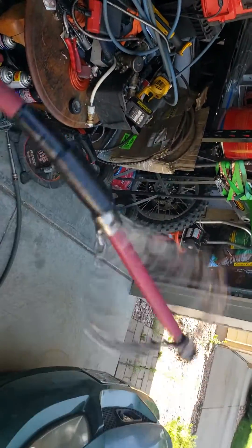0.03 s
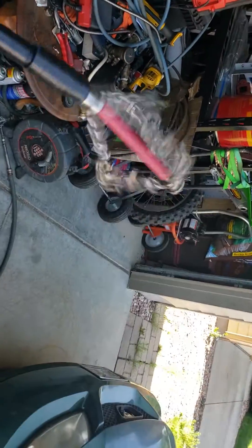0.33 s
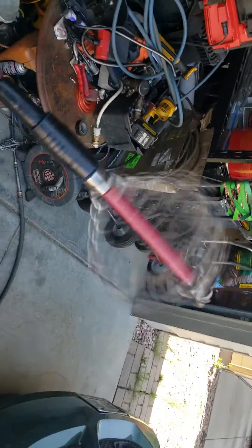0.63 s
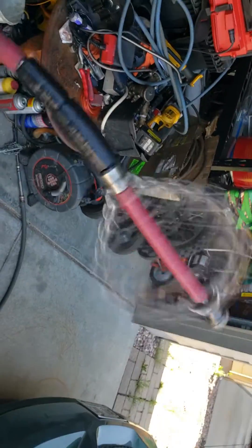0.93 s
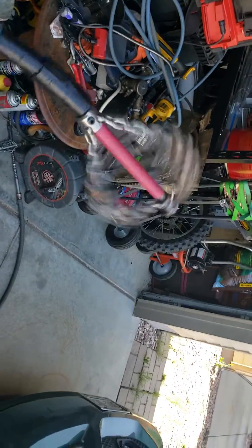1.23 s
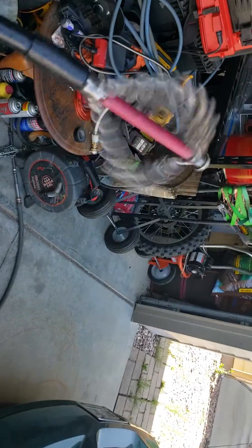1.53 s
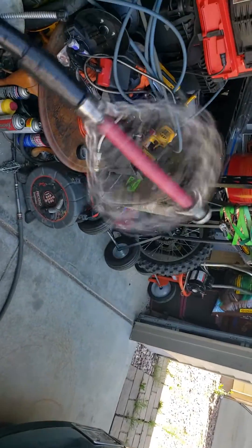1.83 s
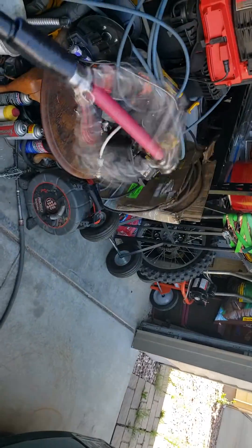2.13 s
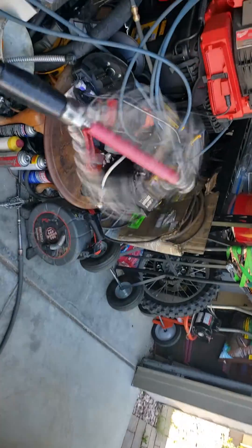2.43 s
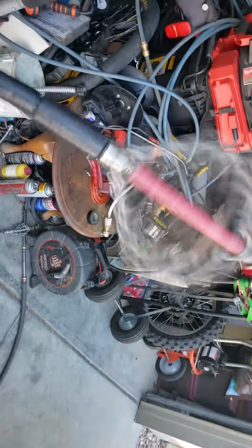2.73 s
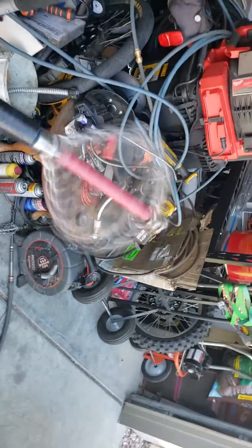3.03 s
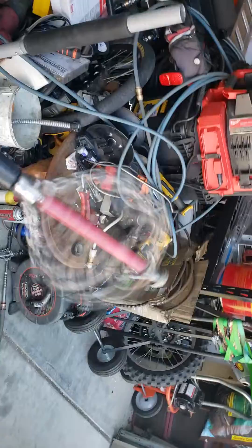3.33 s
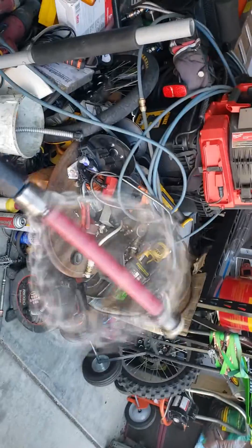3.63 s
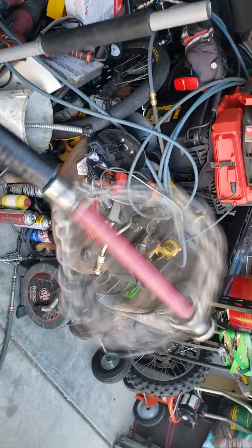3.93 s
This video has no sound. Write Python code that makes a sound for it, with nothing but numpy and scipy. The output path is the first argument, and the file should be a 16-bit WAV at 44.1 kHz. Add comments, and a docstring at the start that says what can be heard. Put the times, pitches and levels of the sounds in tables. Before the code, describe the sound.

Whirling chains rattle brightly over the continuous gear whine of a motor-driven shaft.

```python
"""A bright spray of rattling chain over a gear whine, close to a stereo microphone in a garage.
A motor drives a flexible shaft with chains whirling on its end. The whine sags in pitch under load
and flutters with each turn of the chains. The rattle surges when the links bunch up; now and then
they clack on the shaft, which drums in its sleeve underneath it all."""
import sys
import numpy as np
from scipy import signal
from scipy.fft import rfft, irfft, next_fast_len
from scipy.io import wavfile
from scipy.ndimage import map_coordinates

SR = 44100
rng = np.random.default_rng(int(sys.argv[2]) if len(sys.argv) > 2 else 0)


def unload_audio(sound):
    """Save the sound as a 16-bit wav file, at the path given as the first command line argument."""
    columns = np.transpose(np.atleast_2d(sound))
    # keep every value between -1 and 1, then stretch to whole-number steps
    steps = np.round(np.clip(columns, -1, 1) * 32767)
    wavfile.write(sys.argv[1], SR, steps.astype(np.int16))


N = 176400


def amp(db):
    """Decibels to gain."""
    return 10 ** (np.asarray(db) / 20)


def unit(x):
    """Scale to rms 1."""
    return x / np.sqrt(np.mean(x ** 2) + 1e-20)


def along(points, hz, column=1):
    """One column of a table read on a log frequency axis."""
    cols = np.transpose(points)
    return np.interp(np.log(hz + 1), np.log(cols[0] + 1), cols[column])


def curves(rows):
    """One value per sample for each column after the time."""
    times, *cols = np.transpose(rows)
    return [np.interp(np.arange(N) / SR, times, col) for col in cols]


def wobble(rate):
    """A smooth random curve, rate knots a second."""
    return map_coordinates(rng.standard_normal(int(N * rate / SR) + 4), [np.arange(N) * rate / SR])


def swell(at_s, length_s):
    """A bell of height 1, length_s wide at half height."""
    return .5 ** ((2 * (np.arange(N) / SR - at_s) / length_s) ** 2)


def filtered(x, response):
    """Filter x by a complex response of frequency."""
    size = next_fast_len(N + SR // 2)
    return irfft(rfft(x, size) * response(np.fft.rfftfreq(size, 1 / SR)), size)[..., :N]


def panned(db):
    """Left and right gains for a level difference."""
    return amp(np.array([[.5], [-.5]]) * db)


def at_microphone(pair, spectrum):
    """Two unrelated excitations, coloured and heard at the microphone's two ports, rms 1."""
    # between the ports (frequency [Hz], coherence [0-1], left minus right [dB], left lead [ms])
    ports = [(60, 0.92, 1, 0), (180, 0.97, 2, 0.024), (400, 0.85, 3, 0.019), (810, 0.62, 1, 0),
             (1160, 0.4, -2.3, 0.17), (1550, 0.85, -1, 0.29), (3650, 0.07, -0.5, 0.29),
             (5200, 0.97, -7, 0.29), (7400, 0, 1, 0.252), (11300, 0.47, 2.4, 0.256),
             (15000, 0.54, -3.5, 0.26)]
    blend = lambda hz: np.arccos(np.clip(along(ports, hz), 0, 1)) / 2
    mid, side = filtered(pair, lambda hz: amp(along(spectrum, hz)) * [np.cos(blend(hz)), np.sin(blend(hz))])
    lead = lambda hz: np.exp(np.array([[1j], [-1j]]) * np.pi * hz * along(ports, hz, column=3) / 1000)
    left_right = np.array([mid + side, mid - side])
    return unit(filtered(left_right, lambda hz: lead(hz) * panned(along(ports, hz, column=2))))


def contacts(per_s, spread_db, ring_s, hiss):
    """Random link contacts, each a brief burst of noise, over a steady rub."""
    hits = (rng.random((2, N)) < per_s / SR) * amp(spread_db * np.clip(rng.standard_normal((2, N)), -3, 3))
    power = signal.lfilter([1], [1, -np.exp(-1 / (ring_s * SR))], hits ** 2)
    return unit(np.sqrt(power / power.mean() + hiss) * rng.standard_normal((2, N)))


def struck(blows, modes, rise_s, crack_gain=0, crack_t60_s=.007):
    """Each blow rings the modes a little differently; crack_gain adds an opening snap of noise."""
    out, t = np.zeros((2, N + SR)), np.arange(SR // 6) / SR
    for at_s, peak_db in blows:
        ring = sum(amp(db + rng.normal(0, 1.5, (2, 1)) - 60 * t / t60)
                   * np.sin(2 * np.pi * hz * rng.normal(1, .02) * t) for hz, db, t60 in modes)
        crack = crack_gain * amp(-60 * t / crack_t60_s) * rng.standard_normal((2, len(t)))
        blow = ring * (1 - np.exp(-t / rise_s)) + crack
        out[:, round(at_s * SR):][:, :len(t)] += amp(peak_db) * blow / abs(blow).max()
    return out[:, :N]


def garage(x):
    """The cluttered walls send a short tail back to the microphone."""
    # room decay (frequency [Hz], t60 [s])
    decay = [(200, 0.16), (2000, 0.28), (14000, 0.23)]
    hz, t, noise = signal.stft(rng.standard_normal((2, SR // 2)), SR, nperseg=256)
    tail = signal.istft(noise * amp(-60 * t / along(decay, hz)[:, None]), SR, nperseg=256)[1]
    return signal.fftconvolve(x, tail / np.linalg.norm(tail[0]), axes=1)[:, :N]


def shaft(speed):
    """The whipping shaft drums and rubs in its hollow sleeve, and howls as it speeds up."""
    # course of the drumming (time [s], level [dB])
    drum_levels = [(0.0, -29.5), (0.1, -33), (0.24, -29.5), (0.29, -32), (0.68, -34), (1.37, -29),
                   (1.46, -36), (1.89, -33.5), (2.05, -35), (2.1, -31.5), (2.49, -34), (2.65, -31),
                   (2.68, -39), (2.74, -32), (3.38, -34), (3.51, -38), (3.98, -31), (4.0, -31)]
    # colours of the drumming, the rub and the howl (frequency [Hz], relative level [dB])
    drum_spectrum = [(20, -39), (35, -36), (52, -17.5), (75, -15), (102, -10.5), (128, -16.5), (148, -9),
                     (165, 0), (190, -3), (215, -9), (245, -8.5), (275, -19), (318, -6.5), (355, -11),
                     (420, -20), (600, -21.5), (1200, -41)]
    rub_spectrum = [(300, -45), (480, -8.5), (600, -9), (650, 4), (700, -2.5), (740, 6.5), (785, 0),
                    (850, 4), (908, 8), (970, 1.5), (1250, -5), (1700, -3), (3000, -36)]
    howl_spectrum = [(200, -45), (275, -8), (316, 10), (350, 1.5), (400, -22), (600, -63)]
    idle_speed = 87.1  # turns per second
    rush = lambda spectrum: at_microphone(rng.standard_normal((2, N)), spectrum)
    drum = amp(curves(drum_levels)[0] - .5 + wobble(24.76)) * rush(drum_spectrum)
    rub = amp(-37.5 + 1.5 * wobble(30.37)) * rush(rub_spectrum)
    howl = amp(-44.5 + 1.28 * (speed - idle_speed)) * rush(howl_spectrum)
    return drum + rub + howl


def thumps():
    """The shaft knocks dully against its sleeve."""
    # knocks (time [s], peak [dB])
    blows = [(1.322, -19), (3.024, -20)]
    # sleeve resonances (frequency [Hz], relative level [dB], t60 [s])
    modes = [(172, 0, .12), (322, -3, .12)]
    return struck(blows, modes, rise_s=.005)


def whine(speed, chain_angle):
    """Meshing gears sing over a faint motor hum, fluttering with each turn of the chains."""
    # gear tones (time [s], mesh [dB], left minus right [dB], 2nd harmonic [dB], 3rd harmonic [dB])
    gear_levels = [(0, -33, 0, -39.5, -47), (.1, -40, 2, -39, -54), (.15, -38, 2, -45, -56),
                   (.2, -29.5, 2, -38, -60), (.3, -30.5, -1, -46, -52), (.41, -30.5, -3, -50, -46),
                   (.6, -43, 2, -56, -50), (.71, -32, -1, -42.5, -37), (.82, -42, -3, -50, -50),
                   (.9, -42, -3, -52, -52), (.96, -29.5, -4, -45, -51), (1.11, -37, 1, -52, -53),
                   (1.22, -31, -4, -41.5, -53), (1.35, -28.5, -5, -42, -47), (1.65, -35, -14, -47.5, -43),
                   (2.08, -30.5, -7.5, -44.5, -45), (2.5, -33.5, -13, -47, -46),
                   (2.62, -35.5, -9, -49, -52), (2.78, -28, -4, -44, -47), (3.01, -34, -4, -44, -50),
                   (3.08, -30.5, -4, -37, -48), (3.22, -32, -5, -44, -48), (3.47, -30.5, -6, -56, -49),
                   (3.57, -38, -3, -52, -39.5), (3.72, -32, -4, -53, -44), (4, -31, -1, -52, -48)]
    # gear sidebands (multiple of the drive speed [-], level [dB])
    sidebands = [(67, -51.5), (76, -49.5)]
    # the gear housing muffles the top (frequency [Hz], gain [dB])
    housing = [(7750, 0), (7950, -3), (8200, -20)]
    teeth, hum_order = 30, 10 / 3  # cycles per turn of the drive
    mesh_db, pan_db, second_db, third_db = curves(gear_levels)
    flutter = 1 + .0048 * np.sin(chain_angle) + .002 * wobble(25) + .0035 * wobble(300)
    angle = 2 * np.pi * np.cumsum(speed * flutter) / SR
    runout_db = 2.2 * np.sin(angle)  # the gears mesh tighter and looser once a turn
    chatter_db = 1.8 * wobble(170)  # the load on the teeth jumps about
    partials = [(teeth, mesh_db, pan_db), (2 * teeth, second_db, -6), (3 * teeth, third_db, 1)]
    partials += [(order, db, 0) for order, db in sidebands]
    gears = np.zeros((2, N))
    for order, db, side_db in partials:
        swing_db = 2.3 * np.sin(chain_angle + rng.uniform(0, 2 * np.pi))
        swing_db = swing_db + 1.9 * np.array([wobble(90), wobble(90)])
        if order == teeth:
            swing_db += runout_db + chatter_db
            left_lead_rad = 4.7
        else:  # overtones come and go in rough patches
            swing_db += 2.6 * wobble(16) + 1.8 * np.array([wobble(330), wobble(260)])
            left_lead_rad = rng.uniform(-.49, 1)
        tone = np.sin(order * angle + np.array([[left_lead_rad], [0]]))
        gears += amp(db) * panned(side_db) * unit(amp(swing_db) * tone)
    hum = amp(-48) * unit(amp(1.1 * wobble(16)) * np.sin(hum_order * angle))
    return filtered(gears, lambda hz: amp(along(housing, hz))) + hum


def slaps():
    """Short clattering runs of links against the shaft, scattered off the clutter all round."""
    # runs (time [s], length [s], level [dB])
    runs = [(.133, .04, -28), (.35, .025, -30), (.41, .04, -35), (.752, .025, -28.5), (1.35, .05, -31.5),
            (1.455, .05, -33), (2.699, .03, -36), (3.001, .02, -31), (3.215, .03, -35), (3.42, .05, -37)]
    # colour of the clatter (frequency [Hz], relative level [dB])
    spectrum = [(150, -22), (450, -6), (750, 4), (1300, 0), (2000, 0), (3000, -5), (6000, -17),
                (10000, -35)]
    force = sum(amp(db) * swell(at_s, length_s) for at_s, length_s, db in runs)
    clatter = contacts(per_s=550, spread_db=2, ring_s=.0006, hiss=.2)
    return force * unit(filtered(clatter, lambda hz: amp(along(spectrum, hz))))


def clacks():
    """A chain lands single hard blows on the shaft."""
    # strikes (time [s], peak [dB])
    blows = [(.1326, -20), (.3416, -18), (.396, -22), (.429, -22), (.745, -24), (1.342, -20.5),
             (1.998, -23), (2.999, -13.5), (3.205, -23), (3.762, -24)]
    # ring of the struck metal (frequency [Hz], relative level [dB], t60 [s])
    modes = [(1180, -10, .03), (1640, -5, .028), (2020, 0, .03), (2390, -1, .03), (3650, -7, .018),
             (4700, -8, .015)]
    return struck(blows, modes, rise_s=.0003, crack_gain=amp(-5))


def jingle(per_s=650, centre_hz=4700, span_octaves=1.3, spread_db=10, t60_s=.026):
    """Loose links ring briefly, each at its own pitch and place between left and right."""
    when, pitch, force, place = rng.random((int(per_s * N / SR), 4)).T[..., None]
    t = np.arange(SR // 25) / SR
    hz = centre_hz * 2 ** (span_octaves * (pitch - .5))
    rings = np.sin(2 * np.pi * hz * t) * amp(spread_db * force - 60 * t / t60_s)
    index = (when * N).astype(int) + np.arange(len(t))
    return unit(np.array([np.bincount(index.ravel(), (rings * np.sqrt(share)).ravel(), N)[:N]
                          for share in (place, 1 - place)]))


def chains(chain_angle):
    """Close up, the links tick brightly over a duller scrape of steel, pulsing with each turn."""
    # the chains bunch up (time [s], length [s], rise of the ticking [dB])
    surges = [(0.113, 0.033, 1.5), (0.34, 0.03, 4.5), (0.388, 0.043, 4), (0.762, 0.062, 3),
              (0.946, 0.05, 3.5), (1.058, .02, 3), (1.103, 0.019, 5), (1.185, .033, 2.5), (1.3, 0.016, 6),
              (1.417, 0.022, 1.5), (1.55, .04, 0), (1.757, 0.024, 2.5), (1.844, 0.044, 0.5),
              (1.922, 0.02, 4), (2.126, 0.049, 2.5), (2.163, 0.013, 5), (2.198, 0.03, 5.5),
              (2.297, 0.02, 1), (2.348, .018, 0.5), (2.52, 0.03, 2), (2.682, 0.022, 6), (2.773, 0.023, 4.5),
              (2.995, 0.042, 5), (3.103, 0.039, 2), (3.182, .023, 4.5), (3.258, 0.024, 2.5),
              (3.339, 0.02, 0.5), (3.785, 0.04, 2.5), (3.907, 0.017, 3), (3.956, 0.011, 6)]
    # course of the ticking and the scrape (time [s], level [dB])
    tick_levels = [(0.0, -26.5), (0.21, -29), (0.48, -30.5), (0.75, -31.5), (1.35, -25), (2.15, -28),
                   (3.15, -26.5), (3.6, -29.5), (3.71, -29), (4.0, -25.5)]
    scrape_levels = [(0.0, -32.5), (0.37, -34), (0.63, -34.5), (0.78, -35), (0.89, -34), (1.2, -32.5),
                     (1.38, -30), (1.63, -32), (2.21, -32.5), (3.12, -32.5), (3.43, -33), (3.72, -33),
                     (4.0, -32.5)]
    # bright ticking and duller scrape as picked up, including the microphone's notch near 8.5 kHz
    # (frequency [Hz], relative level [dB])
    tick_pickup = [(3000, -30), (7500, -11), (8600, -19), (9500, -9.5), (10800, -3.5), (11900, -0.5),
                   (12800, -2.5), (14200, -4), (15000, -3.5), (15700, 3), (17000, -6.5)]
    scrape_pickup = [(500, -20), (1000, 2), (1600, 3.5), (2100, 0.5), (2600, 7), (3300, 2), (4500, 0),
                     (5500, 2), (6200, -6.5), (7400, 2.5), (8500, -41), (11000, -16)]
    # sideways drift of the ticking, taken about its mean (time [s], left minus right [dB])
    drift = [(0.0, -2), (1.36, -1), (1.53, -2.5), (3.12, 1.0), (3.83, -1), (3.95, 1), (4.0, -2)]
    surge_db = sum(db * swell(at_s, length_s) for at_s, length_s, db in surges)
    pulse = np.sin(chain_angle) * (1 + .5 * wobble(7.96))
    pan_db, = curves(drift)
    ticks = at_microphone(contacts(per_s=2000, spread_db=6, ring_s=.00083, hiss=.8), tick_pickup)
    ticks *= panned(pan_db - pan_db.mean())
    ticks *= amp(curves(tick_levels)[0] + 2.5 + surge_db + .91 * pulse + 2.3 * wobble(90))
    scrape = at_microphone(contacts(per_s=1500, spread_db=4.5, ring_s=.00039, hiss=1.7), scrape_pickup)
    scrape += amp(-6) * jingle()
    scrape *= amp(curves(scrape_levels)[0] + 1 + .7 * surge_db + .5 * pulse + .95 * wobble(70))
    return ticks + scrape


def scene():
    """One drive turns gears, shaft and chains; the garage walls answer the chains' clatter."""
    # the drive, sagging under load (time [s], speed [turns/s])
    drive_speed = [(0, 93), (.11, 89.3), (.17, 95.3), (.26, 94), (.33, 89.3), (.45, 87.5), (.55, 84.2),
                   (.63, 84.6), (.73, 81.5), (.81, 84), (.87, 83.8), (.99, 88.6), (1.1, 86.7), (1.15, 92.2),
                   (1.32, 90.7), (1.42, 88), (1.54, 86), (1.78, 85.8), (2.06, 87.7), (2.28, 87.1),
                   (2.44, 85.7), (2.56, 86.2), (2.62, 84.7), (2.7, 86.7), (2.8, 87), (2.91, 89.7),
                   (2.98, 86.5), (3.03, 93), (3.12, 92.2), (3.23, 88.6), (3.38, 86.2), (3.5, 86.5),
                   (3.58, 84.2), (3.68, 86.2), (3.77, 85.4), (3.87, 87.5), (4, 87.5)]
    speed, = curves(drive_speed)
    chain_turns = .3 * np.cumsum(speed) / SR  # the chains turn slower than the drive
    chain_angle = 2 * np.pi * (chain_turns + rng.random()) + wobble(3.84)  # they lag and catch up
    metal = chains(chain_angle) + slaps() + clacks()
    return whine(speed, chain_angle) + metal + amp(-5.5) * garage(metal) + shaft(speed) + thumps()


def record(dry, top_hz=15760):
    """Nothing is kept above the band limit."""
    return filtered(dry, lambda hz: hz < top_hz)


dry = scene()
out = record(dry)
unload_audio(out)
```